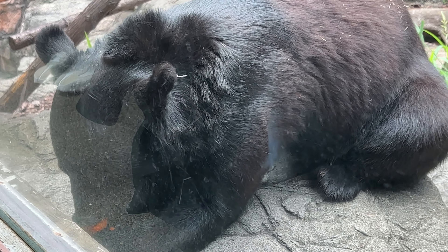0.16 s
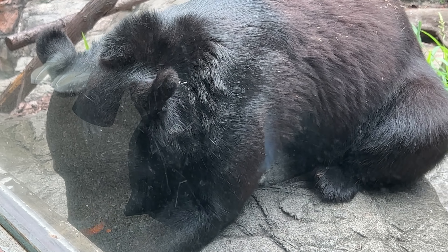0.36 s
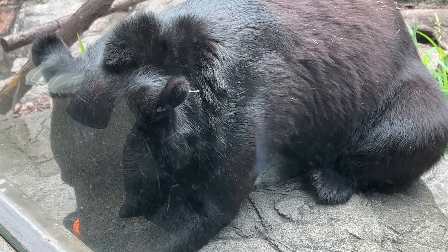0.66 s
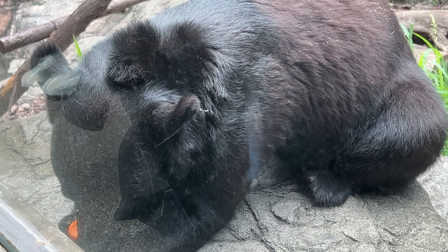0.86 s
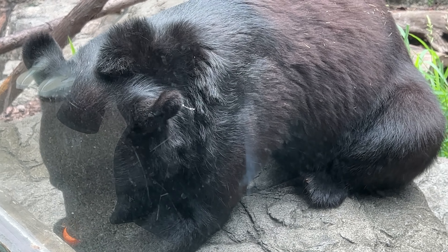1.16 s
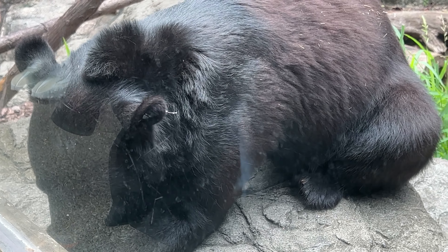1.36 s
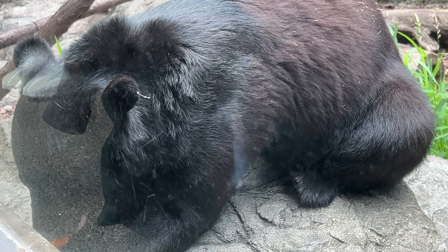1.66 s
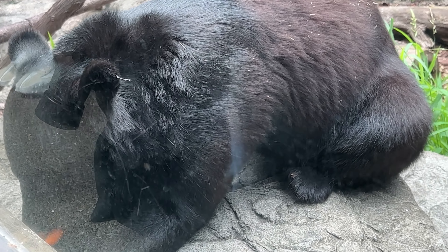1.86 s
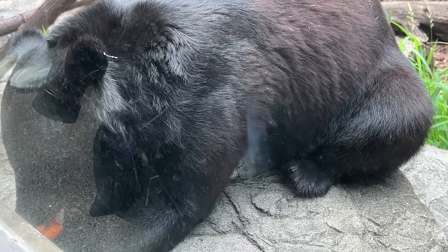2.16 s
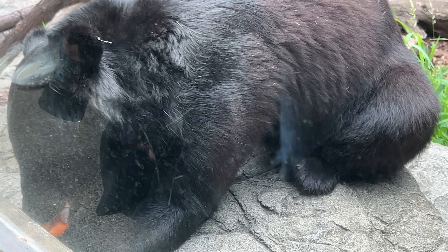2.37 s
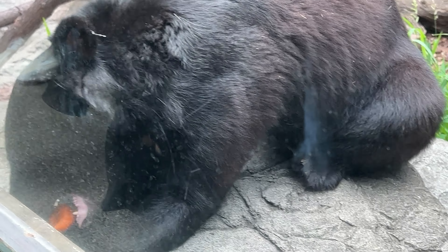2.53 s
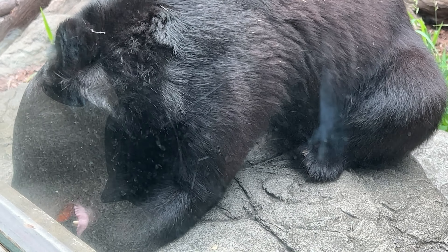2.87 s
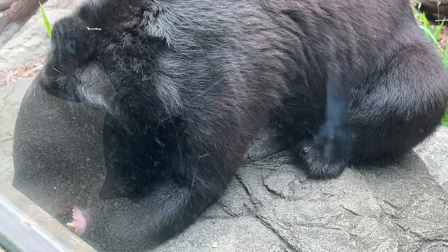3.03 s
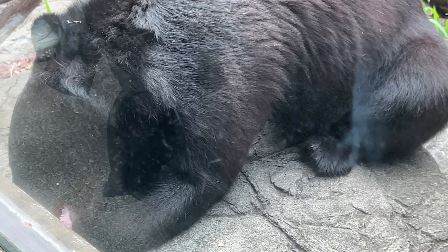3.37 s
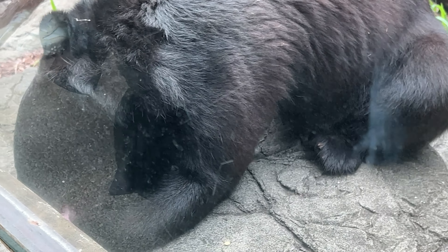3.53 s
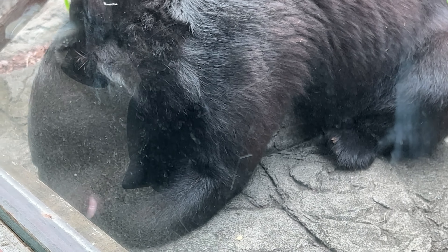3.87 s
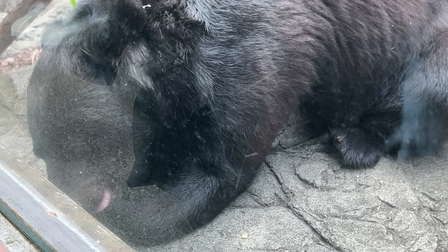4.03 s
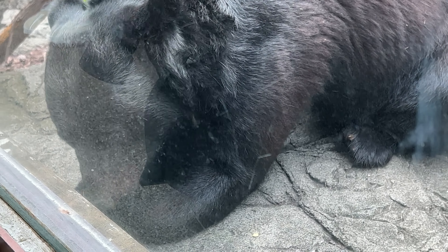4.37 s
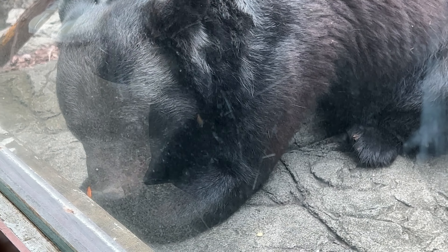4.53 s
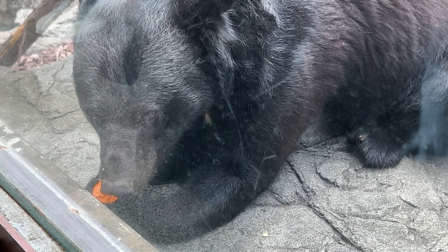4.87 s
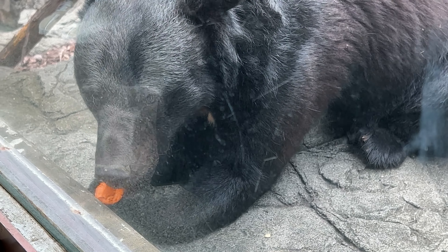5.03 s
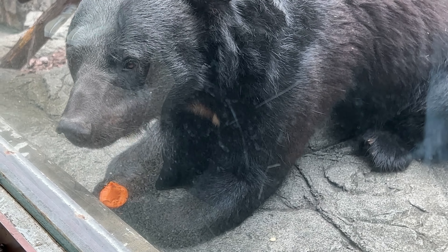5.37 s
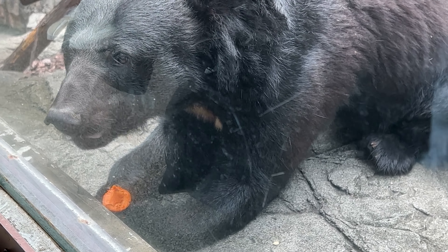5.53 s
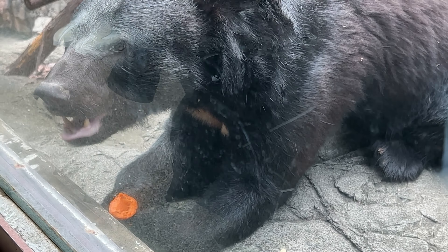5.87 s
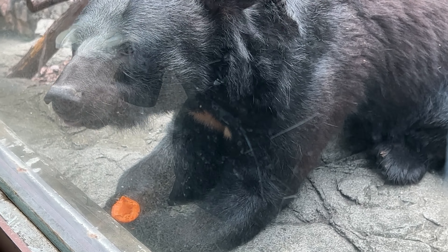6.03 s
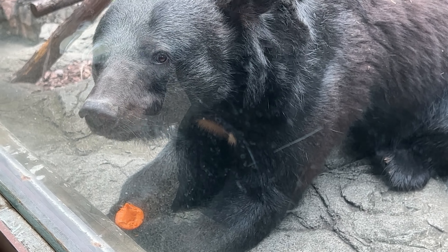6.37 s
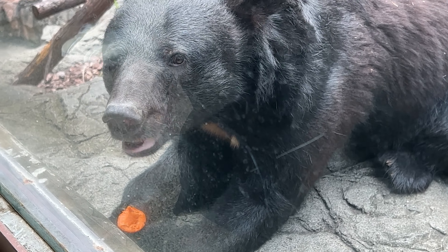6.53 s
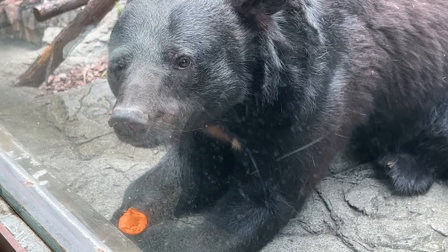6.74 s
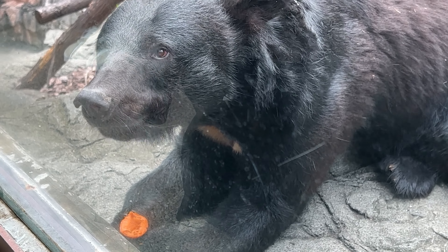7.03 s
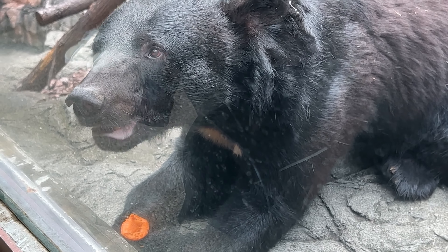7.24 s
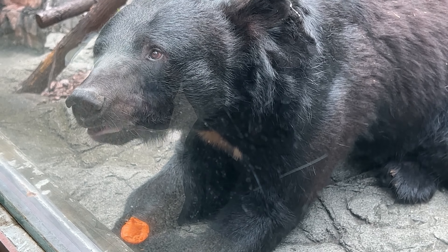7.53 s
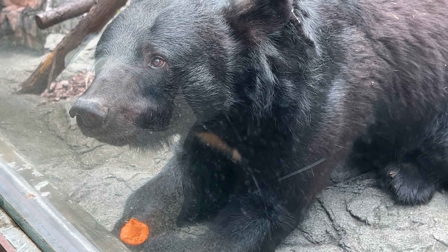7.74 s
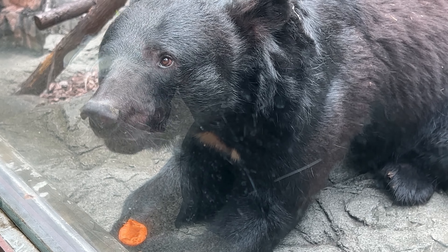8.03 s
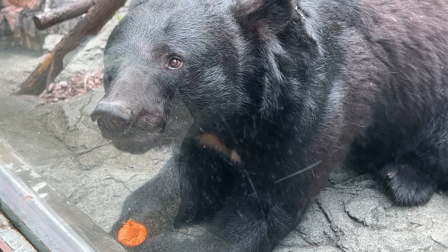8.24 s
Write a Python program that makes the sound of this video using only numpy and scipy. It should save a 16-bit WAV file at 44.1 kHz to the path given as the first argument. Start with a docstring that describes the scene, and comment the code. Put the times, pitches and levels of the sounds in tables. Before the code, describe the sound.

Beside a covered walkway at an animal enclosure, a compressor motor holds a deep, even hum with soft rumble. Past the middle its power cuts: the hum drops out, the casing lurches with low thuds, and loose metal panels rattle and knock for about half a second. Then only faint air hiss, far fan whine and hissing cicadas remain. Stereo, close to the machine.

```python
"""A covered walkway: a compressor motor hums beside it until its power is cut. The shaft runs down, its orders
sliding in pitch, while the hum fades at a fixed pitch. The casing rocks on its mounts as swelling sines, and its
panels rattle and knock as clicks and blows through resonances. Two far fans whine as beating blade tones.
Cicadas sing outside as hissing bands and combs of lines, with thin whistles and a few short faint noises.
Coloured noise with a few resonances gives the faint rumble and hiss of the air."""
import sys
import numpy as np
from scipy import signal
from scipy.fft import rfft, irfft
from scipy.io import wavfile

SR = 44100
rng = np.random.default_rng(int(sys.argv[2]) if len(sys.argv) > 2 else 0)


def store_wav(level_fs):
    """Save 16-bit WAV to argv[1]."""
    pcm = np.round(np.clip(np.atleast_2d(level_fs), -1, 1) * 32767)
    wavfile.write(sys.argv[1], SR, pcm.T.astype(np.int16))


N = 370440

HUM_HZ = 99.86
SHAFT_HZ = 24.484   # turn rate until the cut
CUT_S, COAST_S = 5.385, 0.5   # the power is cut; time constant of the shaft's slowing
SHAFT_HOLD_S, SHAFT_FALL_DB_PER_S = 0.06, 350   # each part holds a while past the cut, then sinks
HUM_HOLD_S, HUM_FALL_DB_PER_S = 0.073, 400
NOISE_HOLD_S, NOISE_FALL_DB_PER_S = 0.79, 45
HISS_HOLD_S, HISS_FALL_DB_PER_S = 0.33, 52
# Shaft orders. Each row: multiple of the turn rate, left level in dB, right level in dB, left lead in radians.
SHAFT_ORDERS = [(3, -47, -47, 0.1), (5, -61, -62, -0.1), (6, -50, -46, -0.3), (7, -62, -61, -0.1),
                (9, -49, -43, 0.8), (10, -57, -57, -0.1), (11, -60, -54, 0.9), (12, -41, -36, 0.2),
                (13, -58, -57, 0.6), (14, -55, -59, 0.4), (15, -57, -56, 1.8), (16, -56, -65, -0.6),
                (18, -55, -67, 0.1), (19, -62, -72, -0.5), (20, -59, -75, -1.1), (24, -60, -56, -1.8),
                (27, -70, -62, 1.3), (28, -65, -67, -2.2), (33, -63, -64, 2.6)]
# Magnetic hum and its products with the shaft. Each row: multiple of the hum, multiple of the turn rate,
# left level in dB, right level in dB, left lead in radians.
HUM_LINES = [(1, 0, -24.6, -24.2, .07), (2, 0, -54, -56, .35), (1, 6, -59, -61, .02), (1, 9, -50, -54, .6),
             (1, 12, -60, -61, -.06)]
# Casing modes kept going by the running motor. Each row: pitch in Hz, width in Hz, level in dB.
CASING_MODES = [(77.5, 0.31, -50), (124, 1.5, -66), (47.8, 1.5, -54)]
# Spectrum of the running noise. Each row: frequency in Hz, density in dB per Hz.
RUNNING_NOISE = [(30, -83), (55, -71), (90, -69), (160, -76), (300, -76.5), (500, -87), (900, -88),
                 (2000, -110)]
# Spectrum of the treble hiss. Each row: frequency in Hz, density in dB per Hz.
TREBLE_HISS = [(8000, -120), (10500, -102), (12500, -105), (15500, -101)]
# Surge of the running noise as the load drops. One row: peak time in seconds, gain in dB of the added
# noise over the running noise, rise in seconds, fall in seconds (over 20 dB each).
LOAD_SURGE = (5.46, 12.3, 0.14, 0.44)


def compressor():
    """Shaft orders slide down with the speed; the magnetic hum keeps its pitch and fades."""
    t = np.arange(N) / SR
    turn_rate = SHAFT_HZ * np.exp(-np.maximum(t - CUT_S, 0) / COAST_S)
    turns = np.cumsum(turn_rate) / SR
    hum_cycles = HUM_HZ * t
    shaft = sum(tone(order * turns, *ears) for order, *ears in SHAFT_ORDERS)
    hum = sum(tone(m * hum_cycles + k * turns, *ears) for m, k, *ears in HUM_LINES)
    casing = 0
    for hz, width_hz, level_db in CASING_MODES:
        ringing = resonance(rng.standard_normal(N), hz, width_hz)
        casing = casing + amp(level_db) * rms_one(ringing)

    shaft_gain = after_cut(SHAFT_HOLD_S, SHAFT_FALL_DB_PER_S)
    hum_gain = after_cut(HUM_HOLD_S, HUM_FALL_DB_PER_S) * amp(0.16 * drift(5.6))
    noise_gain = after_cut(NOISE_HOLD_S, NOISE_FALL_DB_PER_S) + swell(*LOAD_SURGE)
    hiss_gain = after_cut(HISS_HOLD_S, HISS_FALL_DB_PER_S)
    noise = noise_gain * diffuse_noise(RUNNING_NOISE)
    hiss = hiss_gain * diffuse_noise(TREBLE_HISS)
    return shaft_gain * (shaft + casing) + hum_gain * hum + noise + hiss


# Swings of the casing on its mounts. Each row: peak time in seconds, pitch in Hz, level in dB,
# rise in seconds, fall in seconds (over 20 dB each).
CASING_SWINGS = [(5.47, 220, -39, 0.16, .06), (5.525, 99, -21.5, 0.065, 0.052),
                 (5.56, 61.6, -25, .2, 0.087), (5.61, 61.6, -26, .06, .1), (5.71, 97, -34.5, 0.18, 0.074),
                 (5.81, 61.6, -41, .05, .2), (5.96, 97, -44, .15, .08), (6.41, 61.6, -40, .1, 0.18)]


def rocking():
    """The freed casing swings at the pitches of its mounts and walls; swings at one pitch stay in step."""
    t = np.arange(N) / SR
    pitches = sorted({row[1] for row in CASING_SWINGS})
    modes = {hz: tone(hz * t, 0, 0, 0) for hz in pitches}
    return sum(swell(s, db, rise, fall) * modes[hz] for s, hz, db, rise, fall in CASING_SWINGS)


# Bursts of rattling in the loose panels. Each row: peak time in seconds, dull part in dB, bright part in dB,
# rise in seconds, fall in seconds (over 20 dB each).
RATTLE_BURSTS = [(5.398, -43.5, -58, 0.027, 0.34), (5.51, -61, -47.5, 0.17, 0.18),
                 (5.676, -44.5, -39.5, 0.081, 0.066), (5.752, -43.5, -43, 0.054, 0.094),
                 (5.888, -38, -42.5, 0.027, 0.13)]
# Panel modes, also struck by the knocks. Each row: pitch in Hz, width in Hz, relative level in dB.
PANEL_MODES = [(180, 27, -3.5), (1165, 66, 2.5), (1656, 29, -3), (2390, 70, -11.5), (2810, 53, -10.5),
               (4040, 52, -10.5), (4830, 110, -11), (5700, 160, -8), (6330, 200, -5.5), (7000, 180, -13)]
# Broad colour of the panels between the modes. Each row: frequency in Hz, relative density in dB per Hz.
PANEL_COLOUR = [(300, 1.5), (700, 1.5), (2000, -8.5), (4000, -7), (7000, -8.5), (9500, -5), (12000, -10),
                (15500, -14)]


def rattle(contacts_per_s=3000, modes_db=-4):
    """Dense uneven contacts excite the broad body and the modes of the panels; each mode flares on its own."""
    dull_gain = sum(swell(s, dull_db, rise, fall) for s, dull_db, _, rise, fall in RATTLE_BURSTS)
    bright_gain = sum(swell(s, bright_db, rise, fall) for s, _, bright_db, rise, fall in RATTLE_BURSTS)

    sizes_db = 3.0 * np.minimum(rng.exponential(1, (3, N)), 4)
    signs = rng.choice([-1, 1], (3, N))
    hits = rng.random((3, N)) < contacts_per_s / SR
    clicks = amp(sizes_db) * signs * hits + 1e-18

    modes = 0
    for hz, width_hz, level_db in PANEL_MODES:
        flare = amp(level_db + 5.2 * drift(15.6))
        modes = modes + flare * rms_one(resonance(clicks, hz, width_hz))
    body = rms_one(ports(clicks[0], clicks[1:], PANEL_COLOUR))
    panels = body + amp(modes_db) * rms_one(ports(modes[0], modes[1:]))

    # split at 4 kHz, so dull and bright parts swell separately
    dull = signal.sosfilt(signal.butter(2, 4000, "low", fs=SR, output="sos"), panels)
    bright = signal.sosfilt(signal.butter(2, 4000, "high", fs=SR, output="sos"), panels)
    # the minus keeps the two second-order bands in phase at the split
    return dull_gain * rms_one(dull) - bright_gain * rms_one(bright)


# Harder blows on the panels. Each row: start in seconds, level in dB before the mode colour.
PANEL_BLOWS = [(5.39, -47), (5.445, -47), (5.666, -49), (5.884, -44)]
# The blows ring strongest near 1660 Hz, then at 180 Hz; the higher modes are weaker.
# Each row: frequency in Hz, weight in dB.
BLOW_COLOUR = [(180, 2), (1180, -9), (1660, 5.5), (2600, -9), (7000, -17)]


def knocks(contact_s=0.0096):
    """Each soft blow builds up over the contact time, then every panel mode dies at its own rate."""
    out = np.zeros(N)
    t = np.arange(4000) / SR
    for start, level_db in PANEL_BLOWS:
        a = round(start * SR)
        for hz, width_hz, _ in PANEL_MODES:
            decay = np.exp(-np.pi * width_hz * (t - contact_s))
            shape = np.minimum(t / contact_s, decay)
            strength = amp(level_db + at_hz(BLOW_COLOUR, hz) + rng.normal(0, 1.5))
            ring = np.sin(2 * np.pi * (hz * t + rng.random()))
            out[a:a + len(t)] += strength * shape * ring
    return out


SECOND_FAN_LAG_HZ = 7   # the second fan's blade tone lies this much lower
# Course of the fans. Each row: time in seconds, blade tone of the first fan in Hz, loudness offset in dB.
FAN_COURSE = [(0, 691, 0), (2, 691.7, -0.5), (3, 690, 0.5), (4.5, 692.6, -1.5), (5.5, 692.8, -8.5),
              (6.5, 693.8, -1), (8.4, 694.6, 0)]
# Blade tones. Each row: fan number, multiple of its blade tone, start level in dB and end level in dB (both
# before the loudness offset), left-right difference in dB, left lead in radians.
BLADE_TONES = [(0, 1, -60.5, -65.5, 9, 1.1), (0, 2, -61, -67, -2, 0.78), (0, 3, -68, -60, -1.5, 0.3),
               (1, 1, -71, -66, 2.5, -2), (1, 2, -60.5, -64.5, -7, 0.81)]


def fans():
    """Blade tones of two fans at nearly the same speed, beating against each other; each tone wavers."""
    blade_hz, loudness_db = in_time(FAN_COURSE)
    out = 0
    for fan, multiple, start_db, end_db, pan_db, lead in BLADE_TONES:
        level_db = np.linspace(start_db, end_db, N) + loudness_db + 1.6 * drift(1.5)
        cycles = multiple * np.cumsum(blade_hz - fan * SECOND_FAN_LAG_HZ) / SR
        out = out + tone(cycles, level_db + pan_db / 2, level_db - pan_db / 2, lead)
    return out


STAND_OUT_DB = 5   # boost of the line that stands out in a buzz
# One cicada's buzzes. Each row: start in seconds, end in seconds, pulses per second at the start,
# pulses per second at the end, level in dB, multiple of the pulse rate that stands out.
CICADA_BUZZES = [(1.05, 1.47, 189, 201.5, -64, 28), (1.95, 2.17, 194, 195, -73, 26),
                 (2.44, 2.72, 196, 193, -70, 25), (3.03, 3.3, 194, 196, -70, 25),
                 (3.62, 3.8, 195, 195, -75, 26), (6.2, 6.8, 188, 204, -67, 27),
                 (7.17, 7.34, 194, 196, -70, 24), (7.52, 7.82, 196, 193, -68, 26)]
# Lines of the buzz. Each row: multiple of the pulse rate, relative level in dB.
CICADA_LINES = [(21, -10), (22, -7), (23, 0), (24, -7), (25, -3), (26, -6), (27, -3), (28, -4), (29, -9)]


def cicada():
    """Regular tymbal pulses make a comb of lines; they differ in strength and flicker, one stands out per buzz."""
    out = np.zeros(N)
    multiples, lines_db = np.transpose(CICADA_LINES)[:, :, None]
    flickers_db = np.array([4.0 * drift(20.0) for _ in range(4)])
    flicker_of_line = np.arange(len(multiples)) % 4   # the lines share four flickers
    for start, end, start_rate, end_rate, level_db, standout in CICADA_BUZZES:
        a, b = round(start * SR), round(end * SR)
        share = np.linspace(0, 1, b - a)
        rate = start_rate + (end_rate - start_rate) * np.sin(share * np.pi / 2)
        uneven_db = rng.normal(0, 1.5, multiples.shape)
        strengths = amp(level_db + flickers_db[flicker_of_line, a:b] + lines_db + uneven_db)
        strengths[multiples[:, 0] == standout] *= amp(STAND_OUT_DB)
        cycles = multiples * np.cumsum(rate) / SR + rng.random(multiples.shape)
        lines = strengths * np.sin(2 * np.pi * cycles)
        envelope = np.sin(np.pi * share ** 1.5) ** 0.37
        out[a:b] += envelope * np.sum(lines, axis=0)
    return out


# Bands of the high and the low chorus. Each row: centre in Hz, width in Hz of each of two resonances in series.
CICADA_BANDS = [(8285, 1750), (7060, 1700)]
# Swell of the choruses. Each row: time in seconds, high chorus in dB, low chorus in dB.
CHORUS_SWELL = [(0, -53, -63.5), (3.1, -54, -60.5), (4.301, -55.5, -56.5), (5.6, -54, -58.5),
                (8.4, -53.5, -63)]


def chorus():
    """Many far cicadas blur into bands of hiss that flutter slightly."""
    out = 0
    for (hz, width_hz), level_db in zip(CICADA_BANDS, in_time(CHORUS_SWELL)):
        white = rng.standard_normal((3, N))
        band = resonance(resonance(white, hz, width_hz), hz, width_hz)
        flutter_db = 0.64 * drift(25.0)
        out = out + amp(level_db + flutter_db) * rms_one(ports(band[0], band[1:]))
    return out


# Thin whistles, probably far insects; one list per whistle. Each row: time in seconds, pitch in Hz, level in dB.
WHISTLE_GLIDES = [
    [(7.2, 5820, -84), (7.6, 5860, -72), (8.4, 5925, -66.5)],
    [(6.5, 6180, -86), (6.9, 6255, -68), (7.4, 6335, -73), (7.9, 6480, -79), (8.1, 6500, -92)],
]


def whistles():
    """Thin gliding tones that waver in pitch and level."""
    out = 0
    for rows in WHISTLE_GLIDES:
        hz, level_db = in_time(rows)
        level_db = level_db + 1.5 * drift(15.0)
        cycles = np.cumsum(hz + 35.0 * drift(60.0)) / SR
        out = out + tone(cycles, level_db, level_db, 0)
    return out


# Short faint noises. Each row: start in seconds, gain in dB on the resonant noise, centre in Hz, width in Hz,
# rise in seconds, decay time constant in seconds.
FAINT_TICKS = [(1.23, -42, 12000, 9000, 0.00059, .003), (2.83, -33, 1080, 130, .025, .09),
               (3.895, -41, 3980, 7000, .004, 0.0095)]


def ticks():
    """Brief bursts of noise through a resonant peak."""
    out = np.zeros(N)
    t = np.arange(9000) / SR
    for start, level_db, hz, width_hz, rise, decay in FAINT_TICKS:
        a = round(start * SR)
        shape = np.minimum(t / rise, np.exp((rise - t) / decay))
        burst = rng.standard_normal(len(t)) * shape
        out[a:a + len(t)] += amp(level_db) * resonance(burst, hz, width_hz)
    return out


# Spectrum of the air rumble and hiss. Each row: frequency in Hz, density in dB per Hz.
AIR_NOISE = [(25, -85), (50, -69.5), (88, -62), (125, -71.5), (200, -72.5), (280, -79), (480, -75),
             (700, -80), (1100, -83.5), (1900, -89), (3500, -95), (5500, -99), (9000, -100), (12000, -114),
             (15500, -108)]
# Resonances of the walkway in the air noise. Each row: pitch in Hz, width in Hz, level in dB.
WALKWAY_MODES = [(61.3, 7.3, -55.5), (95.6, 3.8, -53.5), (193, 17, -60.5), (484, 11.5, -58.5),
                 (1007, 29, -63.5)]


def air():
    """Diffuse rumble and hiss, drifting in level, with a few steady walkway resonances standing out."""
    white = rng.standard_normal((3, N))
    modes = 0
    for hz, width_hz, level_db in WALKWAY_MODES:
        modes = modes + amp(level_db) * rms_one(resonance(white, hz, width_hz))
    return amp(0.63 * drift(3.4)) * diffuse_noise(AIR_NOISE) + ports(modes[0], modes[1:])


# Phase between the two microphone ports. Each row: frequency in Hz, left lead in radians.
PORT_LEAD = [(0, 0), (2330, -0.0), (3190, -0.4), (6890, 0.1), (7750, -0.7), (8530, -0.6), (10300, 3.1),
             (10900, 3.3), (11800, 6.2), (12400, 6.2), (13400, 9.1), (14400, 9.8), (15200, 12.5),
             (16600, 12.6)]
# Likeness of the ports in a diffuse field. Each row: frequency in Hz, share of power common to both.
PORT_LIKENESS = [(60, 0.98), (140, 1), (300, 0.5), (700, 0.42), (1300, 0.18), (1900, 0.9), (6400, 1),
                 (10000, 0.96), (15000, 1)]


def ports(common, own=None, spectrum=((1, 0), (2, 0))):
    """Colours a sound and leads it to both ports; own = what each port hears alone in a diffuse field."""
    hz = np.fft.rfftfreq(N, 1 / SR)
    turn = np.exp(0.5j * at_hz(PORT_LEAD, hz))   # half the lead on each side
    both = rfft(common) * np.array([turn, 1 / turn])
    if own is not None:
        alike = np.clip(at_hz(PORT_LIKENESS, hz), 0, 1)
        both = np.sqrt(alike) * both + np.sqrt(1 - alike) * rfft(own)
    return irfft(both * amp(at_hz(spectrum, hz)), N)


def diffuse_noise(spectrum):
    """Noise from all around with the given density in dB per Hz."""
    white = rng.standard_normal((3, N)) * np.sqrt(SR / 2)
    return ports(white[0], white[1:], spectrum)


def tone(cycles, left_db, right_db, lead):
    """A sine of given rms in each ear from a chance phase, the left one leading by radians."""
    phase = 2 * np.pi * (cycles + rng.random())
    left = amp(left_db) * np.sin(phase + lead)
    right = amp(right_db) * np.sin(phase)
    return np.sqrt(2) * np.array([left, right])


def resonance(x, hz, width_hz):
    """Two-pole resonance with a peak gain of about 1."""
    r = np.exp(-np.pi * width_hz / SR)
    zeros = [(1 - r * r) / 2, 0, (r * r - 1) / 2]
    poles = [1, -2 * r * np.cos(2 * np.pi * hz / SR), r * r]
    return signal.lfilter(zeros, poles, x)


def drift(rate_hz):
    """Slow chance of rms 1: noise smoothed by two equal poles at every 50th sample."""
    r = np.exp(-100 * np.pi * rate_hz / SR)
    white = rng.standard_normal(N // 50 + 3002)
    slow = signal.lfilter([1], [1, -2 * r, r * r], white)[3000:]   # skip the filter's start
    return np.interp(np.arange(N) / 50, np.arange(len(slow)), rms_one(slow))


def after_cut(hold_s, fall_db_per_s):
    """Gain that holds a while past the cut, then sinks steadily in dB, by 200 dB at most."""
    falling_s = np.clip(np.arange(N) / SR - CUT_S - hold_s, 0, 200 / fall_db_per_s)
    return amp(-fall_db_per_s * falling_s)


def swell(peak_s, level_db, rise_s, fall_s):
    """Gain that climbs to a peak and sinks again, 20 dB in each given time."""
    t = np.arange(N) / SR - peak_s
    steps = np.maximum(-t / rise_s, t / fall_s)
    return amp(level_db - 20 * np.minimum(steps, 10))


def in_time(rows):
    """Columns of a curve table at every sample."""
    s, *columns = np.transpose(rows)
    return [np.interp(np.arange(N) / SR, s, column) for column in columns]


def at_hz(points, hz):
    """A spectrum read on a log-frequency axis."""
    hz_points, values = np.transpose(points)
    return np.interp(np.log(hz + 1), np.log(hz_points + 1), values)


def amp(db):
    """Gain of a level in dB."""
    return np.exp(np.asarray(db) * (np.log(10) / 20))


def rms_one(x):
    """Scaled to rms 1."""
    return x / np.sqrt(np.mean(x ** 2) + 1e-20)


def scene():
    """All sources at the two ports."""
    machine = compressor() + rocking() + rattle()
    background = fans() + chorus() + whistles() + air()
    point_sources = ports(knocks() + cicada() + ticks())
    return machine + background + point_sources


CUTOFF_HZ = 16050


def record(dry):
    """A steep low-pass cuts the top of the treble."""
    return signal.sosfilt(signal.cheby2(20, 80, CUTOFF_HZ, fs=SR, output="sos"), dry)


dry = scene()
out = record(dry)
store_wav(out)
```